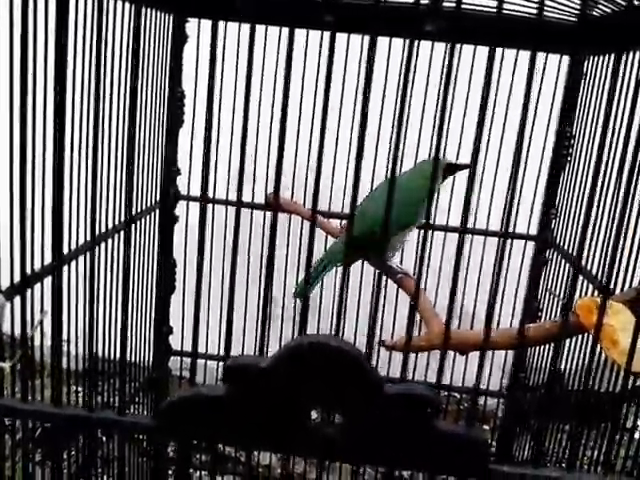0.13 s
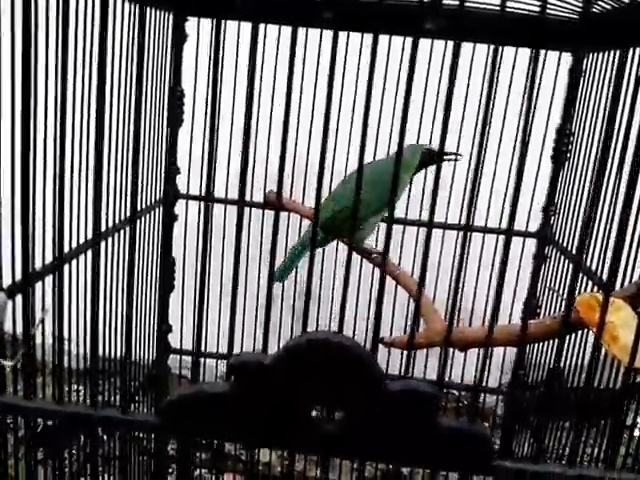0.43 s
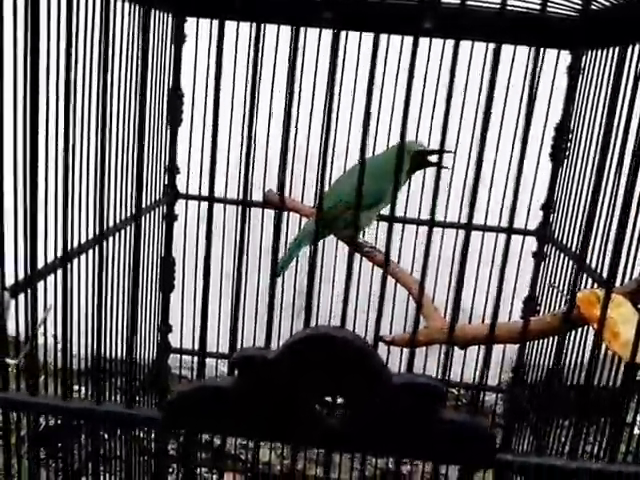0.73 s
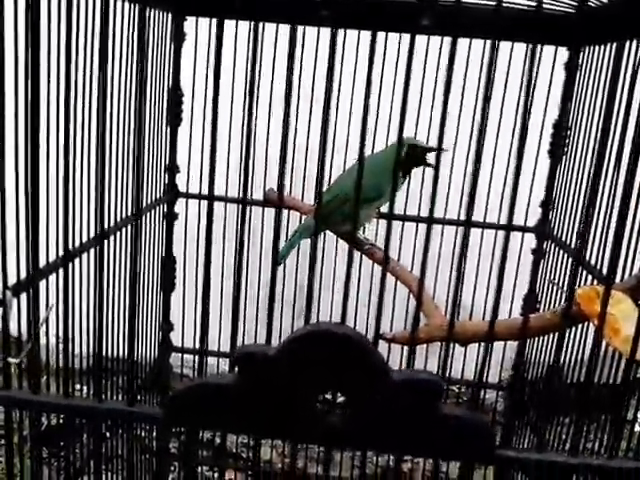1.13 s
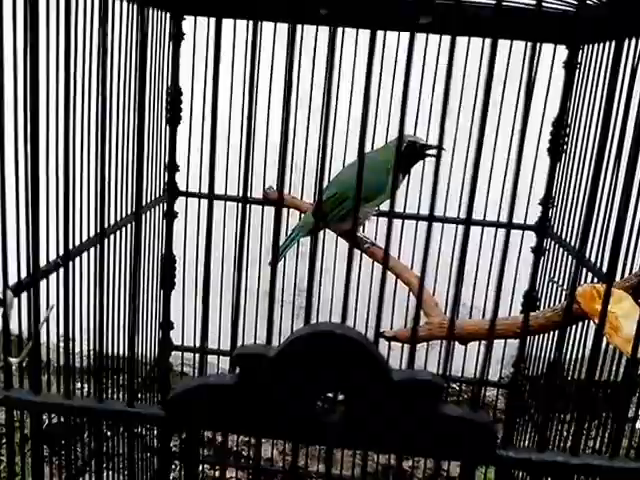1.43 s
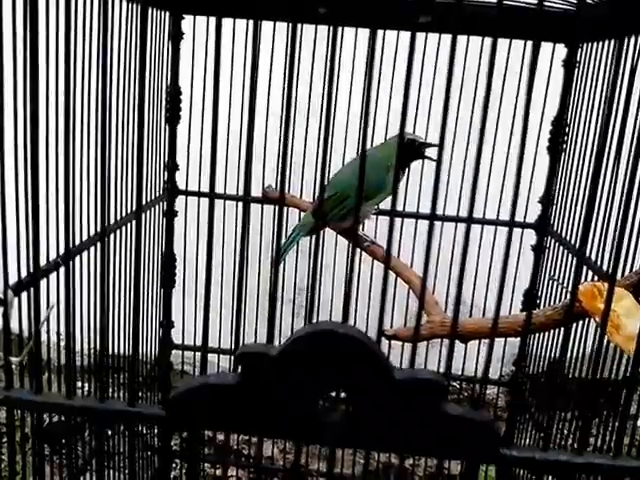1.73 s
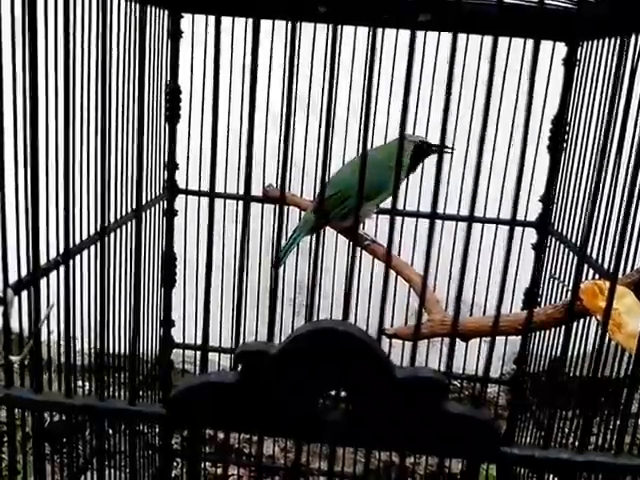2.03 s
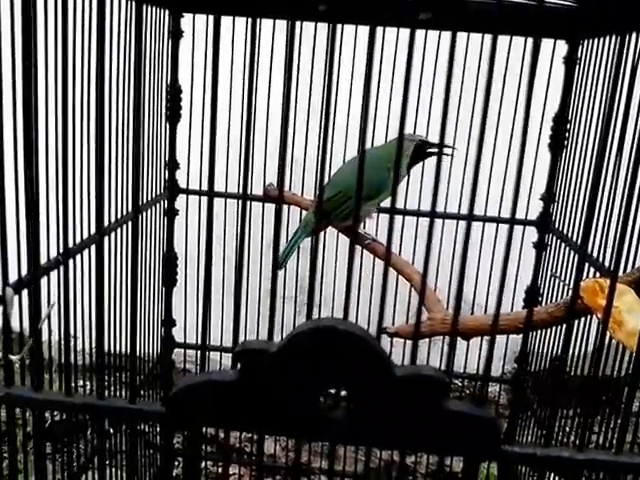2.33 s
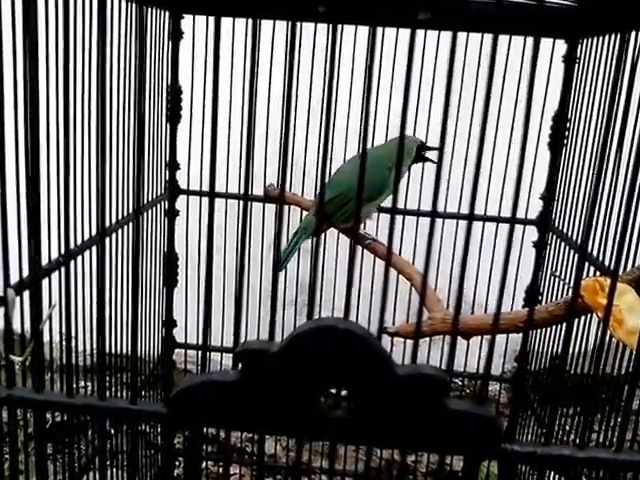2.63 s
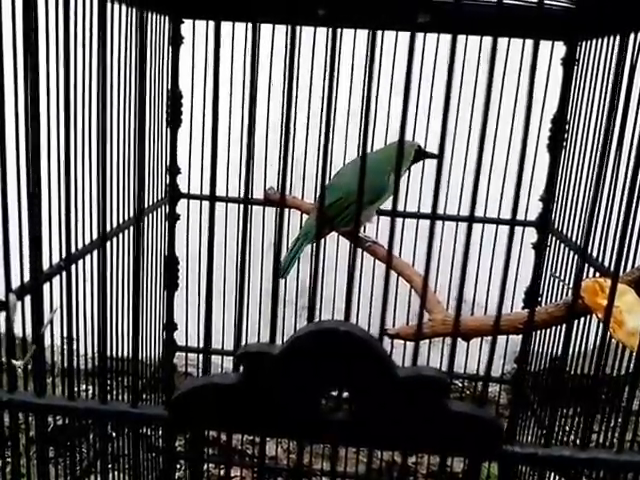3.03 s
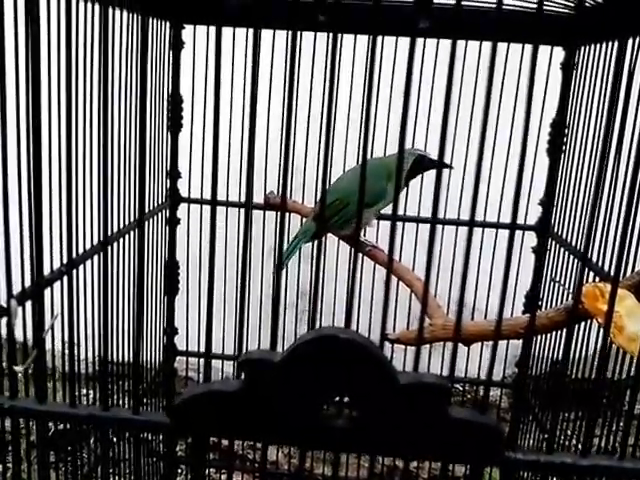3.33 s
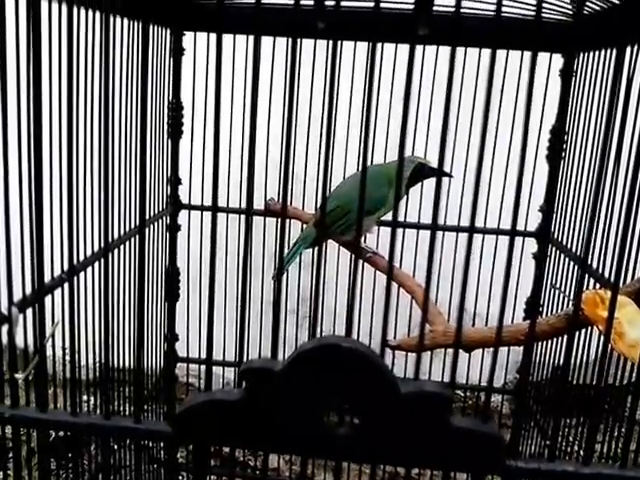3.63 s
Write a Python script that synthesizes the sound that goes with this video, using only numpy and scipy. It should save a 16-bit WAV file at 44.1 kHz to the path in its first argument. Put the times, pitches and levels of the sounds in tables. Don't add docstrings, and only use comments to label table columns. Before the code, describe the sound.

A distant engine drone with a ringing exhaust rises over traffic rumble and soft hiss, loudest near 1.2 seconds, then recedes. From 0.44 a close caged bird chatters thirteen short, harsh, buzzy notes until 1.8, about nine a second. A second, slightly softer run of eight goes from 1.94 to 2.8, with slight wall echo. Heavy vehicles swell the low rumble around 2.7 and again at 3.7.

```python
import sys
import numpy as np
from scipy import signal
from scipy.fft import rfft, irfft
from scipy.io import wavfile

SR = 44100
rng = np.random.default_rng(int(sys.argv[2]) if len(sys.argv) > 2 else 0)


def undo_db(level):
    steps = np.asarray(level, float) / 20
    return 10 ** steps


def unload_wav(signal):
    wavfile.write(
        sys.argv[1],
        SR,
        np.round(np.clip(np.atleast_2d(signal).T, -1, 1) * 32767).astype(np.int16),
    )


N = 167580
LEAD_S = 0.02

# time in seconds, firing rate in Hz, level in dB.
ENGINE_COURSE = [
    (0, 47.24, -34),
    (.6, 49.58, -24),
    (1.2, 51.82, -19.5),
    (1.7, 53.6, -21),
    (2.0, 54.35, -28),
    (3.1, 54.78, -29),
    (3.8, 55.53, -33),
]
# multiple of the firing rate, level in dB.
FIRING_ORDERS = [(1, -11), (2, -1), (3, -10.5), (4, -11), (5, -26), (6, -18.5), (7, -18), (8, -17.5),
                 (9, -21.5), (10, -32), (11, -37), (12, -39), (13, -38.5)]
# time in seconds, ring in Hz, lift in dB.
EXHAUST_RING = [
    (0, 476, 30.5),
    (.45, 469, 24.5),
    (.8, 402, 6),
    (1.5, 402, -0.5),
    (3.8, 325, 3),
]
# frequency in Hz, density in dB per Hz.
TOWN_SPECTRUM = [(18, -50), (30, -24), (64, -5.5), (151, 1), (302, -12), (428, -17.5), (1630, -19.5),
                 (6530, -40.5), (7500, -47.5), (9750, -88), (16500, -120)]
# centre in Hz, width in Hz, level in dB.
TYRE_BANDS = [
    (1060, 64, -42),
    (1500, 240, -39),
]
# time in seconds, rumble level in dB.
HEAVY_LEVEL = [(0, -21.5), (.4, -26), (1.4, -22.5), (2.3, -26), (2.52, -15), (2.7, -10.5), (2.9, -15),
               (3.2, -18), (3.45, -26), (3.7, -9), (3.8, -18)]
# start in seconds, length in seconds, level in dB, then the tops of the low voice
# and of the high voice in Hz.
OPENING_NOTES = [
    (.44, 0.039, -16.5, 1303, 2003),
    (1.936, 0.046, -16, 1338, 2046),
]
FIRST_RUN = [(.529, .027, -15.5, 1392, 1993), (.603, 0.027, -13.5, 1453, 1990),
             (.695, 0.028, -14, 1437, 2142), (.797, 0.034, -14.5, 1486, 2222),
             (.902, 0.039, -16, 1566, 2210), (1.002, 0.039, -13.5, 1470, 2192),
             (1.106, 0.043, -13.5, 1500, 2275), (1.22, 0.037, -12.5, 1552, 2216),
             (1.333, 0.046, -13.5, 1512, 2091), (1.46, 0.046, -13.5, 1621, 2233),
             (1.588, 0.045, -13, 1573, 2293), (1.725, 0.049, -15, 1484, 2040)]
SECOND_RUN = [
    (2.061, .028, -21, 1482, 2210),
    (2.144, 0.0333, -17, 1434, 2140),
    (2.237, 0.03, -18.5, 1460, 2190),
    (2.373, 0.04, -15.5, 1440, 2160),
    (2.495, .041, -16.5, 1462, 2190),
    (2.617, .041, -16, 1440, 2165),
]
CLOSING_NOTES = [
    (2.747, .046, -15.5, 1386, 2107),
]
# multiple of the low voice, multiple of the gap between voices, level in dB.
SUM_TONES = [(1, 0, -1.5), (1, 1, 2.5), (1, 2, -4.5), (2, 0, 1), (2, 1, 1.5), (2, 2, 0.5), (3, 0, -4),
             (3, 1, -1.5), (3, 2, -8.5), (4, 0, -15), (4, 1, -11.5), (4, 2, -13), (5, 0, -14)]
# delay in seconds, level in dB.
WALL_ECHOES = [
    (.016, -18),
    (.031, -15),
]


def curve(rows, col, t, log=False):
    a = np.array(rows, float)
    if log:
        return np.interp(np.log(t), np.log(a[:, 0]), a[:, col])
    return np.interp(t, a[:, 0], a[:, col])


def unit(x):
    return x / np.sqrt(np.mean(x ** 2))


def band(hz, width_hz, size=N):
    f = np.arange(size // 2 + 1) * SR / size
    spectrum = rfft(rng.standard_normal(size)) * np.exp(-((f - hz) / width_hz) ** 2)
    return unit(irfft(spectrum, size))


def walk(rate, size=N):
    return band(0, rate, size=size)


def bell(f, hz, width_hz):
    return 1 / (1 + (2 * (f - hz) / width_hz) ** 2)


def engine(t):
    firing_hz = curve(ENGINE_COURSE, 1, t) * (1 + 0.002705 * walk(1.68))
    turns = np.cumsum(firing_hz) / SR
    ring_hz, ring_db = curve(EXHAUST_RING, 1, t), curve(EXHAUST_RING, 2, t)
    out = 0
    for k, db in FIRING_ORDERS:
        lift = ring_db * bell(np.round(k) * firing_hz, ring_hz, width_hz=45)
        level = undo_db(db + lift + 2.85 * walk(3.66))
        out = out + level * np.sin(2 * np.pi * (np.round(k) * turns + rng.random()))
    return np.sqrt(2) * out * undo_db(curve(ENGINE_COURSE, 2, t))


def traffic_hiss():
    out, swell_db = 0, walk(0.41)
    for hz in 28 * 2 ** (np.arange(17) / 2):
        bandwidth_db = 10 * np.log10(hz)
        db = curve(TOWN_SPECTRUM, 1, hz, log=True) + bandwidth_db + swell_db + 1.4 * walk(15)
        out = out + undo_db(db) * band(hz, 0.39 * hz)
    return undo_db(-23) * unit(out)


def tyres():
    return sum(undo_db(db + 1.5 * walk(1)) * band(hz, width) for hz, width, db in TYRE_BANDS)


def heavy_vehicles(t):
    pass_s, pass_width_s, pass_lift_db = 2.94, 0.44, 8
    drone_db = -9 + pass_lift_db * np.exp(-((t - pass_s) / pass_width_s) ** 2)
    heavy = band(83.5, 17.6) + undo_db(drone_db) * band(154.5, 31.4)
    return undo_db(curve(HEAVY_LEVEL, 1, t) - 5.5) * heavy


def syrinx(t, length, low_hz, high_hz):
    edge_hz, locked_top_hz, sag_hz, droop_hz_per_s = 1310, 1452, 41, 13000
    u, since = t / length, np.maximum(t, 0)
    arch = np.maximum(1 - (2 * u - 1) ** 2, -1)
    free = np.exp(-((u - 0.478) / 0.2847) ** 4)
    shake = 0.006 + 0.03 * np.exp(-since / 0.007)
    top = min(low_hz, locked_top_hz)
    locked = edge_hz + (top - edge_hz) * arch - droop_hz_per_s * np.maximum(t - length, 0)
    locked = locked * (1 + shake * walk(300, size=len(t)))
    low = locked + free * (low_hz - top)
    loose = (high_hz - sag_hz * (1 - arch)) * (1 + shake * walk(240, size=len(t)))
    gap = free * loose + (1 - free) * locked * 3 / 2 - low
    return low, gap, free


def note(length, low_hz, high_hz, open_hz, shut_hz, beak_s, low_db, rasp_db, tail_s):
    t = np.arange(8192) / SR - LEAD_S
    since, size = np.maximum(t, 0), len(t)
    low, gap, free = syrinx(t, length, low_hz, high_hz)
    open_hz = open_hz + 45000 * min(length - .045, 0)
    beak_hz = shut_hz + (open_hz - shut_hz) * np.exp(-(since / beak_s) ** 2)
    throat_db = 16 * (1 - np.exp(-(since / 0.04) ** 2))

    def fade(end):
        return np.clip((end - t) / 0.01 + .5, 0, 1) ** 2

    tone = 0
    for m, n, db in SUM_TONES:
        f = np.round(m) * low + np.round(n) * gap
        db = db + 8 * bell(f, beak_hz, 1000) + throat_db * bell(f, 2865, 330)
        db = db + 2.2 * walk(68, size=size) + low_db * (m + n < 1.5)
        db = db - 2.5 * np.maximum(f - beak_hz, 0) * (t / length) / 1000
        top_hz = m * low_hz + n * (high_hz - low_hz)
        end = length + tail_s * (1 - top_hz / 3900)
        share = free if n > 1.5 else 1 + (1 - free) * 0.61 * (n < .5 < m - 1)
        phase = 2 * np.pi * (np.cumsum(f) / SR + rng.random())
        tone = tone + undo_db(db) * fade(end) * share * np.sin(phase)
    swell = np.clip((t + 0.0074) / 0.013, 0, 1)
    burst_db = -2.5 + rasp_db + 330 * (length - .045)
    burst = undo_db(burst_db) * np.exp(-((t - 0.0024) / 0.011) ** 2)
    husk = undo_db(-18.5 + rasp_db) * swell * fade(length - tail_s)
    return undo_db(-8.5) * tone * swell + (burst + husk) * band(4660, 2370, size=size)


def yard(x):
    t60_s, gap_s = 0.29, 0.0052
    t = np.arange(SR // 2) / SR
    tail = band(3600, 3000, size=len(t)) * undo_db(-60 * t / t60_s) * (t > gap_s)
    tail = undo_db(-14.5) * tail / np.sqrt(np.sum(tail ** 2))
    tail[0] = 1
    for lag, db in WALL_ECHOES:
        tail[int(lag * SR)] = undo_db(db)
    return signal.fftconvolve(x, tail)[:N]


def bird():
    out = np.zeros(N)
    kinds = [([*FIRST_RUN, *SECOND_RUN], (5480, 2750, 0.03, 0, 0, 0.0019)),
             (CLOSING_NOTES, (5480, 2750, 0.014, -10, 0, 0.026)),
             (OPENING_NOTES, (4470, 1950, 0.015, -9.5, -7.5, 0.026))]
    for rows, beak in kinds:
        for start, length, db, low_hz, high_hz in rows:
            x = note(length, low_hz, high_hz, *beak)
            i = int((start - LEAD_S) * SR)
            out[i:i + len(x)] += undo_db(db - 4.5) * x
    return yard(out)


def scene():
    t = np.arange(N) / SR
    return (engine(t) + traffic_hiss() + tyres() + heavy_vehicles(t) + bird())[None]


def low_pass(x):
    return signal.sosfilt(signal.butter(12, 8400, fs=SR, output="sos"), x)


def record(dry):
    rounded = np.tanh(1.323 * dry) / 1.185
    top_cut = signal.cheby1(12, .5, 7343, fs=SR, output="sos")
    low_cut = signal.butter(2, 35, "high", fs=SR, output="sos")
    mix = signal.sosfilt(low_cut, signal.sosfilt(top_cut, rounded))
    return low_pass(mix)


dry = scene()
out = record(dry)
unload_wav(out)
```